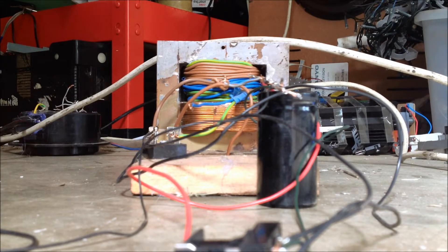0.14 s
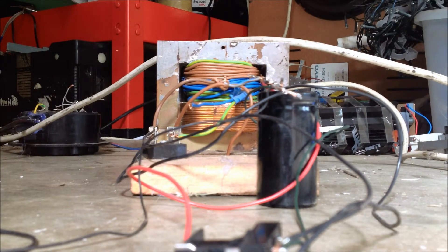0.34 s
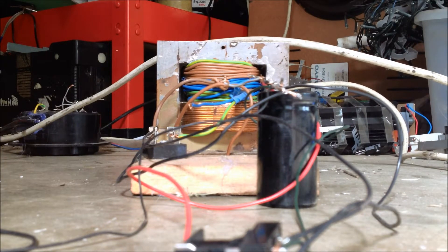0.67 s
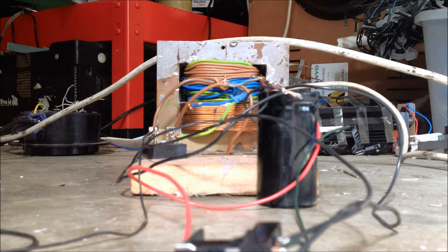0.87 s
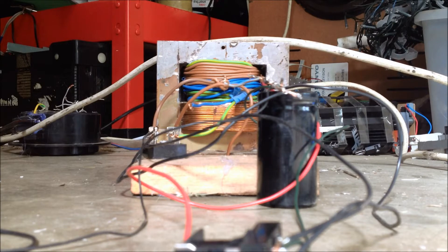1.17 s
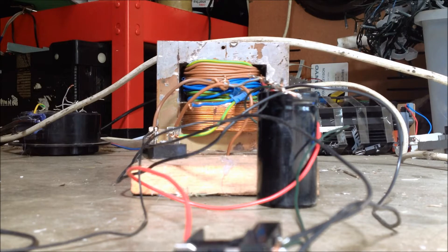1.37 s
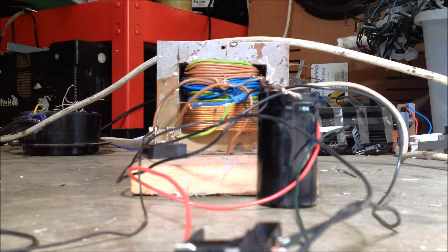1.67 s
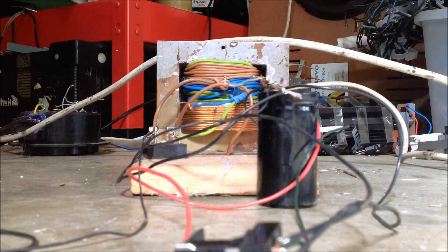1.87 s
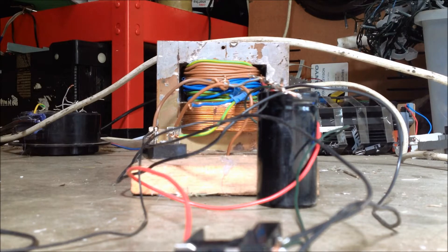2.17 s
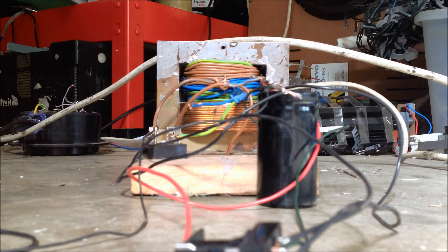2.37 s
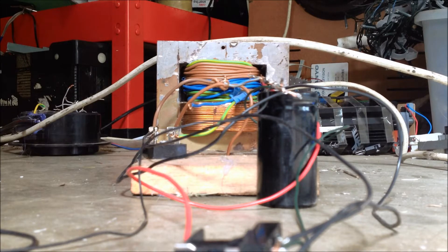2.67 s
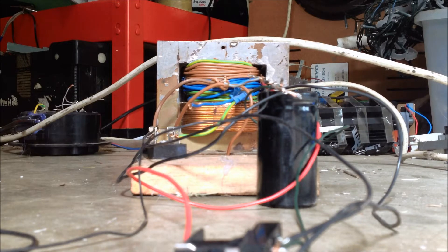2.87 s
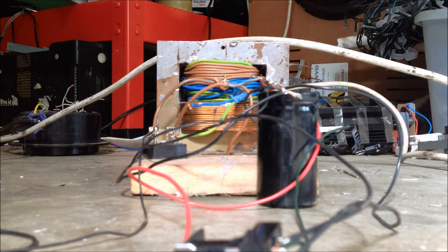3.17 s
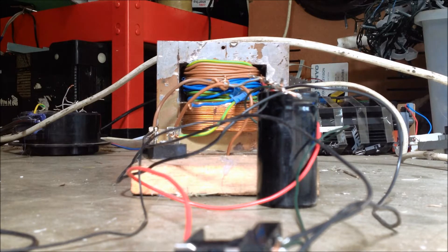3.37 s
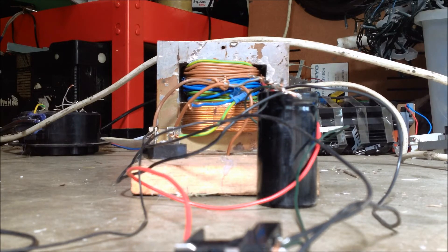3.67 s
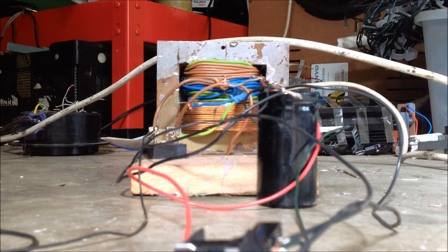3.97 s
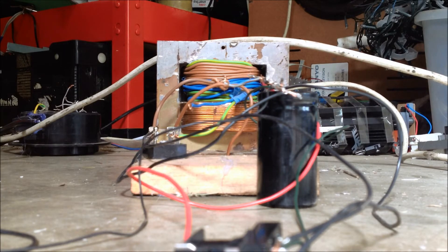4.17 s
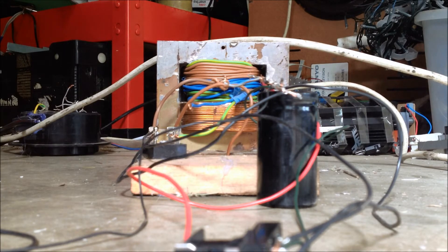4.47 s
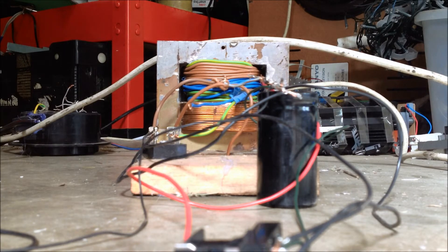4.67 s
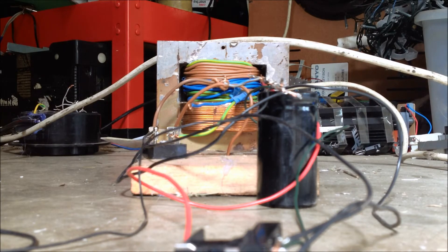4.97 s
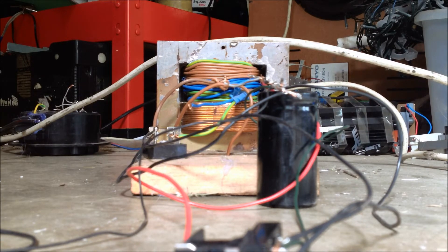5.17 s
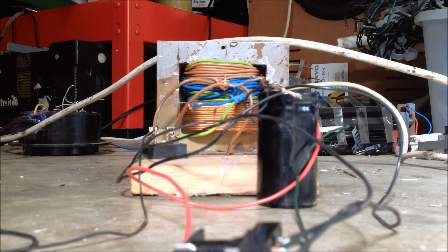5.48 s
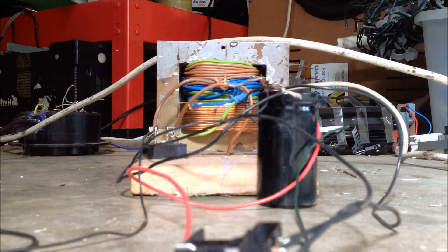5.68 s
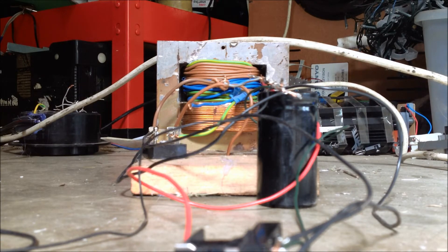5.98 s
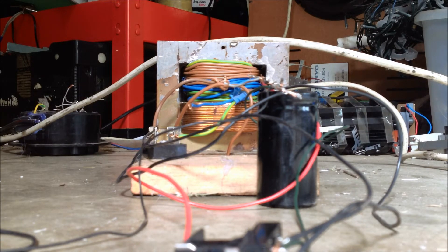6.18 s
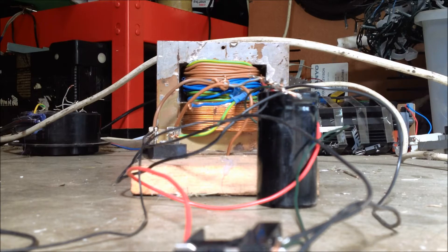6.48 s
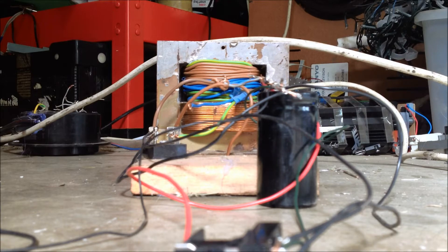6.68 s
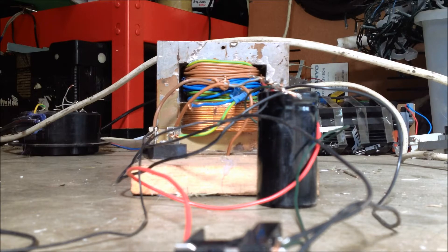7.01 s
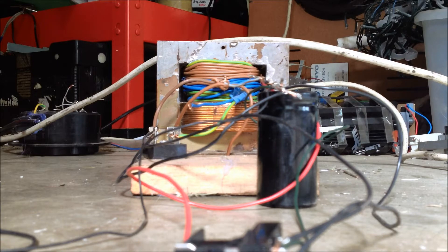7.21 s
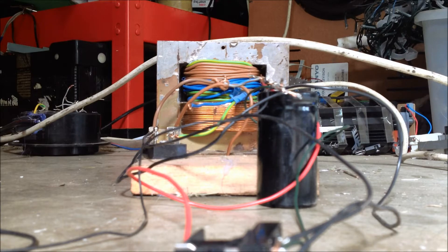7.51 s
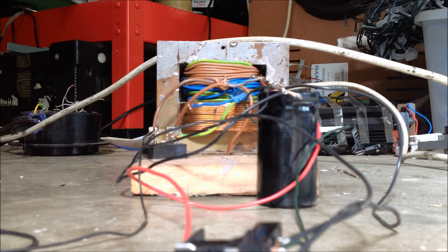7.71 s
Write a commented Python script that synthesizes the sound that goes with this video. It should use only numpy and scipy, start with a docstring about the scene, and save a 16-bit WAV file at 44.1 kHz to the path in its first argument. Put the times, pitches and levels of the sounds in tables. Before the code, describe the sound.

Six irregular volleys of sharp electric spark cracks, each with a switch knock and trailing sputter, over faint workshop hum and a few faint bird whistles.

```python
"""Sparks crack about 19 ms apart in six short volleys on a workshop floor, with misfires between them.
A homemade driver fires an ignition coil: its switch knocks shut, then a sputter follows as the contact opens.
Shaped bursts make sparks and knocks, gliding sines a bird's whistles, wavering sines and noise hum and air.
Decaying noise is the room; the recorder's gain control drops on loud peaks and creeps back."""
import sys
import numpy as np
from scipy import signal
from scipy.fft import rfft, irfft
from scipy.io import wavfile
from scipy.ndimage import uniform_filter1d, minimum_filter1d

SR = 44100
rng = np.random.default_rng(int(sys.argv[2]) if len(sys.argv) > 2 else 0)


def to_wav(sig):
    """Store sig (one row per channel, or 1-D mono) as 16-bit WAV at the path in sys.argv[1].

    Samples outside -1..1 are clipped; the rate is SR.
    """
    pcm = np.clip(np.atleast_2d(sig), -1, 1) * 32767
    pcm = np.round(pcm).astype(np.int16)
    wavfile.write(sys.argv[1], SR, pcm.T)  # frames by channels


N = 346185
TIME = np.arange(N) / SR
BUMP_S = 7.5879  # handling bump: knocks the housing and starts a rustle


def from_db(db):
    """Decibels to gain."""
    return 10 ** (np.asarray(db) / 20)


def unit_energy(x):
    """Scale to a total energy of 1."""
    return x / np.sqrt(np.sum(x ** 2) + 1e-20)


def at_hz(rows, hz, axis=1):
    """Interpolate a table column on a log-frequency axis."""
    rows = np.array(rows)
    return np.interp(np.log(np.maximum(hz, 1)), np.log(rows[:, 0]), rows[:, axis])


def level_curve(rows):
    """Gain in time from rows of (t/s, level/dB)."""
    return from_db(np.interp(TIME, *np.transpose(rows)))


def add(out, s, sound):
    """Mix a short sound in at time s."""
    start = int(np.clip(round(s * SR), 0, N - 1))
    out[start:start + len(sound)] += sound[:N - start]


def colour(x, spectrum, size=4096):
    """Causal minimum-phase filter of unit energy, its spectrum folded through the cepstrum."""
    log_gain = np.log(from_db(at_hz(spectrum, np.fft.rfftfreq(size, 1 / SR))))
    cepstrum = irfft(log_gain)
    cepstrum[1:size // 2] *= 2
    cepstrum[size // 2 + 1:] = 0
    impulse_response = unit_energy(irfft(np.exp(rfft(cepstrum))))
    return signal.oaconvolve(x, impulse_response)[:N]


def resonance(x, hz, width_hz):
    """Band-pass resonance of unit energy."""
    edges_hz = [max(hz - width_hz / 2, 180), hz + width_hz / 2]
    band = signal.butter(2, edges_hz, "band", fs=SR, output="sos")
    impulse_response = unit_energy(signal.sosfilt(band, np.eye(1, 2048)[0]))
    return signal.oaconvolve(x, impulse_response)[:N]


def drift(rate_hz):
    """Straight lines between normal random values drawn rate_hz times a second."""
    return np.interp(TIME * rate_hz, np.arange(4096), rng.standard_normal(4096))


def burst(length_ms, decay_ms, grain_db, size=1024):
    """Ragged micro-pulses with a near-even spectrum that hold briefly, then die away; unit energy."""
    ms = np.arange(size) / SR * 1000
    fade = np.exp(-np.maximum(ms - length_ms, 0) / decay_ms)
    grain = np.interp(ms * 2, np.arange(size), rng.standard_normal(size))
    pulses = rng.standard_normal(size) * from_db(grain_db * grain) * fade
    for _ in range(3):  # flatten the spectrum, then restore the fade
        flat = irfft(np.exp(1j * np.angle(rfft(pulses))))
        pulses = flat * np.minimum(2 * fade, 1)
    return unit_energy(pulses)


def sparks(leader_s=0.0021, leader_db=-15, afterglow_db=-13, channel_db=0.63, push_db=3.0, suck_db=-3.0):
    """A leader fizzes across the gap and the channel cracks; heated air pushes out and falls back."""
    # spectra: (f/Hz, relative density/dB)
    sizzle, crack, rasp = [(300, -57), (6000, -32.5), (9000, -14), (10500, -5), (12300, -1), (14800, -1),
                           (17000, -9)], [(300, -45.5), (4200, -24.5), (5300, -15.5), (6400, -1.5),
                                           (7500, -0.5), (8900, -4), (11000, -21.5), (17000, -34.5)], [(300, -27), (1500, -8.5), (2100, -5), (2600, -4),
                                                          (3200, -2), (4000, -0.5), (5000, -2.5),
                                                          (7000, -17.5), (17000, -35)]
    puff, thump = [(50, -33), (150, -8), (300, -1.5), (1000, 1.5), (1550, -3), (2050, -10.5), (2600, -12),
                   (3200, -7), (5000, -13), (16000, -30)], [(25, -22.5), (70, -19.5), (125, -1), (180, 2.5), (310, -2), (520, -12.5),
                                 (2000, -48.5)]
    fizz = np.zeros((3, N))
    puffs, thumps = np.zeros((2, N))
    for s, length_ms, *colours_db, puff_db, thump_db in discharges():
        for band, db in zip(fizz, colours_db):
            leader = burst(.8, decay_ms=.6, grain_db=2.5)
            channel = burst(length_ms, decay_ms=0.99, grain_db=2.5)
            afterglow = burst(3.4, decay_ms=4.5, grain_db=1.5)
            add(band, s - leader_s, from_db(db + leader_db) * leader)
            add(band, s, from_db(db + channel_db) * channel)
            add(band, s + length_ms / 1000, from_db(db + afterglow_db) * afterglow)
        add(puffs, s, from_db([puff_db + push_db]))
        add(thumps, s + .0004, -from_db([thump_db + suck_db]))
    snaps = sum(colour(band, spectrum) for band, spectrum in zip(fizz, (sizzle, crack, rasp)))
    return snaps + colour(puffs, puff) + colour(thumps, thump)


def discharges():
    """Sparks as (s, length ms, dB of sizzle, crack, rasp, puff, thump): beats, then misfires between."""
    # evenly spaced cracks: (t/s, period/ms, cracks, relative sizzle of the first/dB,
    # hardest air push/cracks after the first, relative puff there/dB, relative thump there/dB)
    volleys = [(1.3664, 19.1, 2, 16.5, 0.029, -3, -9), (2.087, 18.7, 2, 16.2, 0.0096, -8, -12.5),
               (2.6855, 19, 1, 19.5, 0, -8.5, -18), (3.2659, 19.7, 2, 17.5, 0, -8.5, -10),
               (3.3234, 19, 1, 12.5, 0.033, -16.5, -32.5), (5.4665, 18.6, 3, 17, 0, -5.5, 1),
               (6.4878, 17.9, 3, 19, 1.16, -1.5, -3.5)]
    # misfires: (t/s, length/ms, relative energy/dB, dullness 0-1)
    misfires = [(1.3798, 1.2, -7, .95), (1.3815, 2.1, 0, 0.1), (2.1009, .68, 7.5, 0.7),
                (2.671, 1.8, 1.5, 0), (2.6758, 2.5, 3, 0.99), (3.2522, 1.5, -3.5, .4),
                (3.2806, 1.6, -1.5, 0), (5.4804, 2, -3, .02), (6.4957, 1.6, -6, .4)]
    crack_db, rasp_db = -10, -23  # re sizzle
    sizzle_loss_db = 2.66  # per crack
    puff_loss_db, thump_loss_db = 8.5, 12.5  # per crack away from the hardest push
    crack_ms, crack_shrink = 1.4, .82  # first length, share kept by each next crack
    # dB of sizzle, crack, rasp, puff, thump
    thin_mix_db = np.array((11.5, 0, -13, -27, -31))
    dull_mix_db = np.array((-1.5, 2, -3.5, -5.5, -20.5))

    for start_s, period_ms, cracks, db, heaviest, puff_db, thump_db in volleys:
        for k in range(round(cracks)):
            steps = abs(k - heaviest)
            sizzle_db = db - sizzle_loss_db * k
            yield (start_s + k * period_ms / 1000, crack_ms * crack_shrink ** k,
                   sizzle_db, sizzle_db + crack_db, sizzle_db + rasp_db,
                   puff_db - puff_loss_db * steps, thump_db - thump_loss_db * steps)
    for s, length_ms, db, dull in misfires:
        mix_db = db + (1 - dull) * thin_mix_db + dull * dull_mix_db
        yield (s, length_ms, *mix_db)


def sputters(bounce_ms=1.15, fall_db_per_ms=3.5, floor_lag_s=0.001, floor_echo=0.36, count=11):
    """The opening contact bounces, spits and rings; returns near sound with floor echo, and room splash."""
    # contact openings: (t/s, relative energy/dB, length before the fall/ms)
    openings = [(1.5622, 10, 3.1), (2.1985, 8.5, 2.9), (2.7674, 10.5, 1.57), (3.3415, 8.5, 4.0),
                (5.6211, 9.5, 5.8), (6.6816, 9.5, 5.3)]
    # contact ringing: (f/Hz, t60/s, level re sputter/dB)
    contact_modes = [(7560, .28, -70.5), (8200, .28, -76), (12560, 0.085, -60)]
    # spit spectrum: (f/Hz, relative density/dB)
    spit_spectrum = [(70, -52), (350, -37), (1200, -31.5), (2300, -23), (3100, -18), (5300, -18),
                     (6500, -11.5), (7300, -0.5), (8200, -4.5), (9400, -12.5), (11000, -8), (12700, 1),
                     (14800, -5.5), (17000, -14)]
    spits, splash, rings = np.zeros((3, N))
    t = TIME[:SR // 2]
    for s, db, length_ms in openings:
        ms = bounce_ms * (np.arange(count) + rng.uniform(0, .7, count))
        first_weak_db = -5 * (np.arange(count) == 0)
        fall_db = fall_db_per_ms * np.maximum(ms - length_ms, 0)
        sizes = unit_energy(from_db(first_weak_db + rng.normal(0, 2.9, count) - fall_db))
        for delay_ms, size in zip(ms, sizes):
            spit = burst(0.14, decay_ms=0.275, grain_db=1)
            add(spits, s + delay_ms / 1000, from_db(db) * size * spit)
        add(splash, s, from_db(db) * burst(length_ms, decay_ms=1.5, grain_db=2.5))
        for hz, t60_s, mode_db in contact_modes:
            decay = from_db(db + mode_db + rng.normal(0, 1.8) - 60 * t / t60_s)
            add(rings, s, decay * np.sin(2 * np.pi * hz * t))
    reflected = np.interp(TIME - floor_lag_s, TIME, spits)
    near = colour(spits + floor_echo * reflected, spit_spectrum) + rings
    return near, colour(splash, spit_spectrum)


def switch(knock_lead_s=0.00019):
    """Each touch knocks on the hollow housing, with a bright tick from the metal parts."""
    # housing resonances of thud, clack, ping: (f/Hz, width/Hz)
    housing = [(800, 1150), (2130, 1150), (3450, 1100)]
    # metal tick spectrum: (f/Hz, relative density/dB)
    tick = [(300, -22.5), (2000, -13.5), (4000, -3), (5400, 1.5), (7500, 0), (9500, -4.5), (12500, -4),
            (16000, -6)]
    blows = np.zeros((4, N))
    for s, levels_db, length_ms in touches():
        for blow, db in zip(blows, levels_db):
            knock = burst(length_ms, decay_ms=0.64, grain_db=3.5)
            rattle = burst(length_ms, decay_ms=5.6, grain_db=5.5)  # loose parts
            add(blow, s - knock_lead_s, from_db(db) * knock)
            add(blow, s + .002, from_db(db - 6) * rattle)
    body = sum(resonance(blow, hz, width_hz) for blow, (hz, width_hz) in zip(blows, housing))
    return body + colour(blows[3], tick)


def touches():
    """Touches as (s, dB of thud, clack, ping, tick, length ms); brightness favours tick, force ping."""
    # single knocks, most as the switch shuts: (t/s, relative energy/dB, brightness/dB, length/ms)
    knocks = [(0.1668, -30.5, -11, .4), (0.5166, -48, -15.5, .4), (0.6023, -49, -19, .4),
              (1.3483, -27.5, 4, 4), (2.0755, -19.5, 0, 7.7), (2.666, -25, 1.5, 2.1), (3.2469, 2, 1, .66),
              (4.8748, -31, 1.5, .4), (5.454, -29.5, -2, 4.2), (6.484, -19.5, 2, 2.2),
              (6.849, -37.5, 0, .4)]
    # double clicks as the lever moves: (t/s, relative energy/dB, brightness/dB)
    double_clicks = [(1.303, -39, 0), (1.996, -38.5, -0.5), (2.603, -35.5, 0.5), (3.1632, -33.5, -0.5),
                     (5.025, -46.5, -5.5), (6.003, -41.5, -2.5), (6.963, -40, -2.5), (7.678, -28.5, -13)]
    second_click_s, second_click_loss_db, click_ms = .0255, 1, .4
    # four values: thud, clack, ping, tick
    bump_ms, bump_mix_db = .95, (-25.5, -47.5, -43, -13.5)
    light_knock_db, knock_mix_db = -32, (-14, 0, -2, 0)  # neutral brightness; mix re knock
    tilt = np.array((-1, -.3, 0.45, 1.1))  # dB per dB of brightness
    force_shares = np.array((-.06, 0.013, 0.15, -.1))  # dB per dB beyond a light knock
    # bump repeats: first gap, its growth, loss and dulling per touch
    stutter_s, stutter_growth, stutter_loss_db, stutter_dulling_db = 0.0063, 1.3, 5, 2

    def mix(db, bright_db):
        """Split a knock's energy into four part levels."""
        return db + bright_db * tilt + (db - light_knock_db) * force_shares + knock_mix_db

    for s, db, bright_db, length_ms in knocks:
        yield s, mix(db, bright_db), length_ms
    for s, db, bright_db in double_clicks:
        yield s, mix(db, bright_db), click_ms
        yield s + second_click_s, mix(db - second_click_loss_db, bright_db), click_ms
    for k in range(3):
        delay_s = k * stutter_s * stutter_growth ** (k - 1)
        loss_db = k * (stutter_loss_db + stutter_dulling_db * tilt)
        yield BUMP_S + delay_s, bump_mix_db - loss_db, bump_ms


def handling():
    """The bump starts a rustle of coloured noise: a scuff dies at once over a rub that holds, then fades."""
    # rustle spectrum: (f/Hz, relative density/dB)
    rustling = [(40, -33), (160, -2.5), (500, -1.5), (1200, -1.5), (2500, -7.5), (5500, -11), (9500, -17),
                (15000, -14)]
    attack_s, scuff_db, scuff_fall_db_per_s = 0.0082, -52, 600
    rub_db, rub_hold_s, rub_fall_db_per_s = -58, 0.13, 61
    t = np.maximum(TIME - BUMP_S, 0)
    scuff = from_db(scuff_db - scuff_fall_db_per_s * np.maximum(t - attack_s, 0))
    rub = from_db(rub_db - rub_fall_db_per_s * np.maximum(t - rub_hold_s, 0))
    envelope = np.minimum(t / attack_s, 1) ** 2 * (scuff + rub)
    return envelope * colour(rng.standard_normal(N), rustling) * from_db(1.3 * drift(120))


def bird(flutter_db=5.0):
    """Sagging sine whistles from outside; rasp adds pitch waver and a higher voice, and the level flutters."""
    # notes: (t/s, length/s, nominal f/Hz, relative level/dB, rasp 0-1)
    notes = [(0.806, 0.097, 3420, -76.5, 0.78), (3.543, .22, 3700, -79.5, .2),
             (4.364, 0.16, 3985, -79.5, 0.21), (4.687, 0.044, 4900, -68, 0.59),
             (5.99, 0.042, 4920, -70.5, 0.68), (7.352, 0.043, 5000, -71.5, 0.7),
             (7.705, 0.053, 5420, -66, 0.8)]
    note_sag, note_waver = 0.02, 0.075  # shares of the pitch
    upper_voice_ratio, upper_voice_db = 1.21, -0.5  # level at full rasp
    out = np.zeros(N)
    for s, length_s, pitch_hz, db, rasp in notes:
        u = np.linspace(0, 1, int(length_s * SR))
        envelope = np.sqrt(2 * np.abs(np.sin(np.pi * u)))
        for ratio, size in ((1, 1), (upper_voice_ratio, rasp ** 2 * from_db(upper_voice_db))):
            sag = 1 + note_sag * (.5 - u)
            waver = 1 + note_waver * rasp * drift(550)[:len(u)]
            phase = 2 * np.pi * np.cumsum(ratio * pitch_hz * sag * waver) / SR
            add(out, s, size * from_db(db) * envelope * np.sin(phase))
    return out * from_db(flutter_db * drift(99))


def background(waver_hz=2.2):
    """Coloured air noise and equipment hum, sine lines of wavering pitch."""
    # workshop air: (t/s, mean level before gain control/dB)
    air_levels = [(0, -66.5), (.8, -63.5), (3.6, -62.5), (5.4, -65), (6.4, -62), (7.85, -61.5)]
    # air spectrum: (f/Hz, relative density/dB)
    air_spectrum = [(25, -39.5), (50, -30.5), (110, -15.5), (160, -10), (200, 0), (260, -10), (420, -7.5),
                    (600, -13), (1200, -15.5), (2100, -22), (4200, -25), (7500, -27), (10000, -31.5),
                    (13500, -28)]
    # equipment hum: (centre f/Hz, rms before gain control/dB)
    hum_lines = [(199.3, -73), (420, -79), (936.7, -88), (1174, -84), (1405, -84), (1642, -82)]
    air = level_curve(air_levels) * colour(rng.standard_normal(N), air_spectrum) * from_db(.5 * drift(10))
    hum = 0
    for hz, db in hum_lines:
        phase = 2 * np.pi * np.cumsum(hz + waver_hz * drift(8)) / SR
        hum = hum + np.sqrt(2) * from_db(db) * np.sin(phase)
    return air + hum


def workshop(x, first_echo_s=0.0014, count=14):
    """Diffuse reverberation: band-passed noise tails with a decay time for each band."""
    # reverberation: (f/Hz, t60/s, in-band energy re send/dB)
    room_bands = [(149.6, .2, -27), (706, 0.24, -23), (2000, 0.38, -15.5), (3280, .3, -16.5),
                  (4570, 0.27, -12.5), (7494, 0.24, -23), (10100, .3, -20), (12000, .22, -17),
                  (15524, .12, -19.5)]
    t, response = TIME[:SR * 3 // 4], 0
    edges_hz = np.geomspace(80, 17000, count + 1)
    for low, high in zip(edges_hz, edges_hz[1:]):
        hz = np.sqrt(low * high)
        decay = from_db(-60 * t / at_hz(room_bands, hz))
        tail = unit_energy(rng.standard_normal(len(t)) * decay * (t > first_echo_s))
        band = signal.butter(2, [low, high], "band", fs=SR, output="sos")
        response = response + from_db(at_hz(room_bands, hz, axis=2)) * signal.sosfilt(band, tail)
    return signal.oaconvolve(x, response)[:N]


def scene():
    """The coil is close, its switch a little farther; the bird is heard mostly through the room."""
    arcs, clicks, whistles = sparks(), switch(), bird()
    contact, splash = sputters()
    send = arcs + from_db(3.0) * clicks + from_db(-0.5) * splash + from_db(14.5) * whistles
    direct = arcs + clicks + contact + from_db(-7.0) * whistles + handling()
    return (direct + workshop(send) + background())[None]


def gain_control(x, threshold_db=-17, depth_db=9.0, release_db_per_s=6.0, size=221):
    """Peaks pull the gain down just ahead of themselves; it creeps back within a second and a half."""
    peak_db = -minimum_filter1d(-20 * np.log10(np.abs(x) + 1e-9), size)
    over_db = np.clip(peak_db - threshold_db, 0, depth_db)
    release_db = release_db_per_s * TIME
    held_db = np.maximum.accumulate(over_db + release_db, axis=-1) - release_db
    return x * from_db(-uniform_filter1d(held_db, size // 2))


def record(dry):
    """Gain control, a ceiling at full scale, and a steep cut of the top."""
    cutoff_hz = 15250
    limited = np.clip(gain_control(dry), -1, 1)
    return signal.sosfilt(signal.ellip(10, .3, 70, cutoff_hz, fs=SR, output="sos"), limited)


dry = scene()
out = record(dry)
to_wav(out)
```